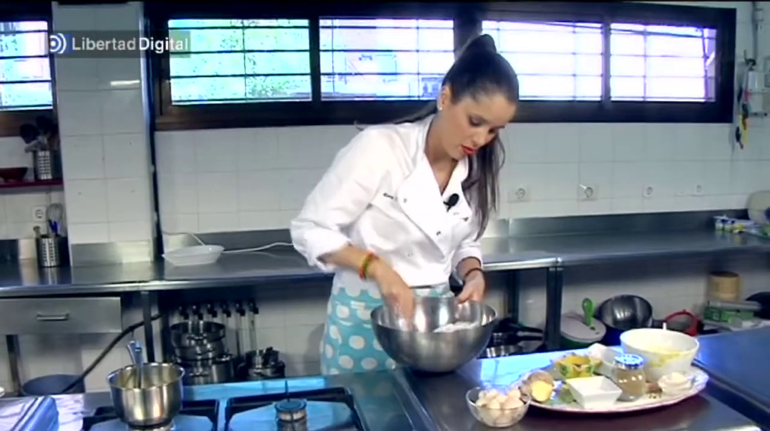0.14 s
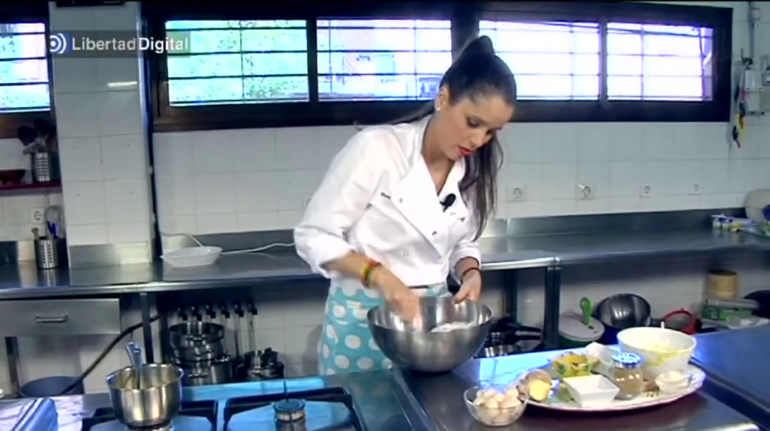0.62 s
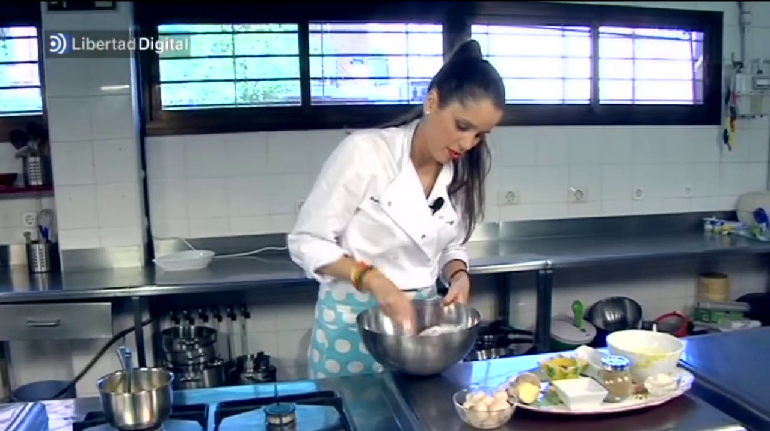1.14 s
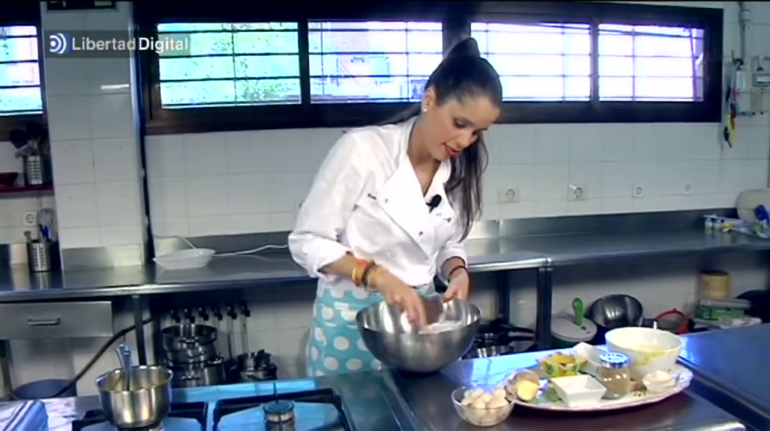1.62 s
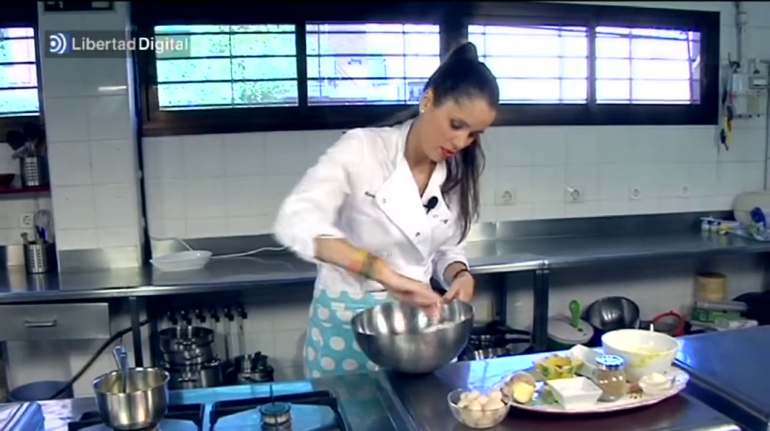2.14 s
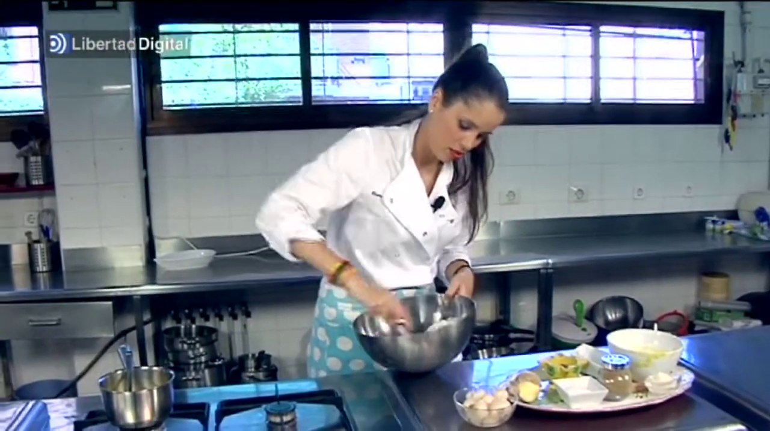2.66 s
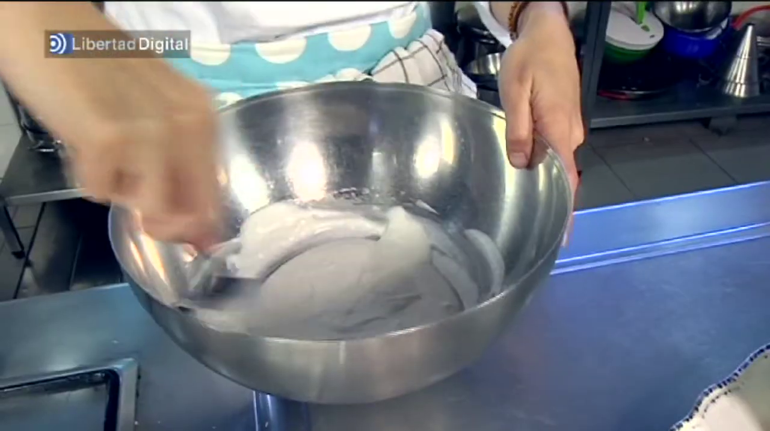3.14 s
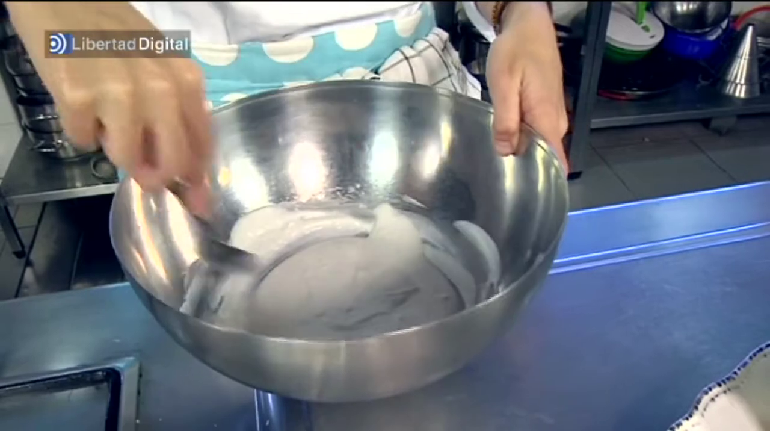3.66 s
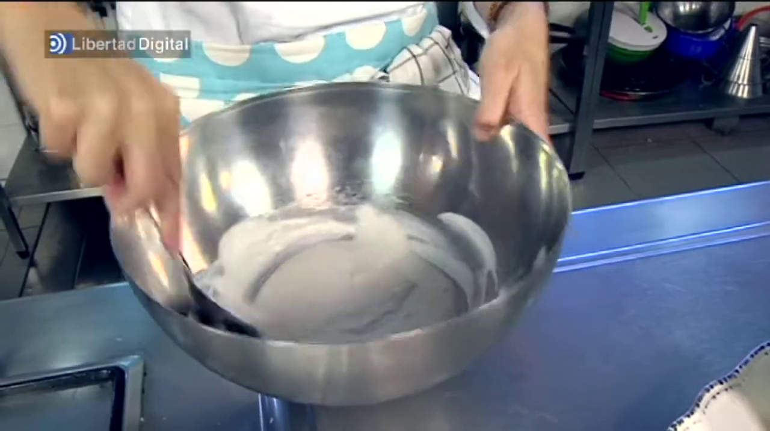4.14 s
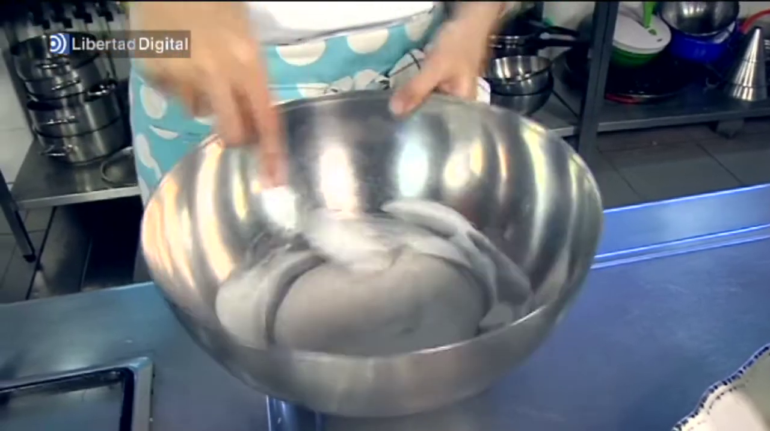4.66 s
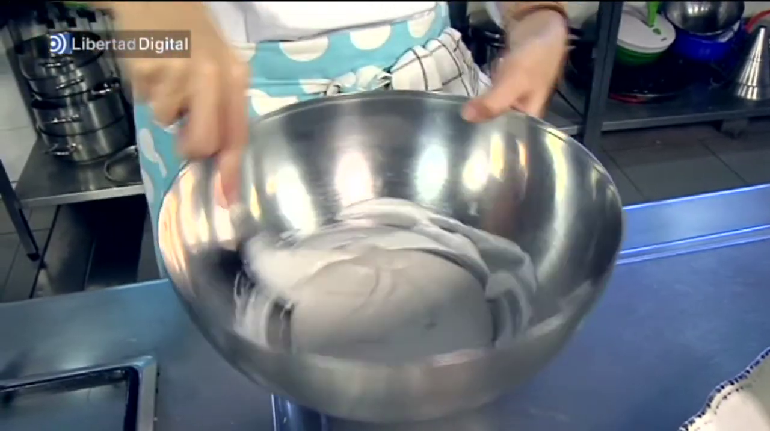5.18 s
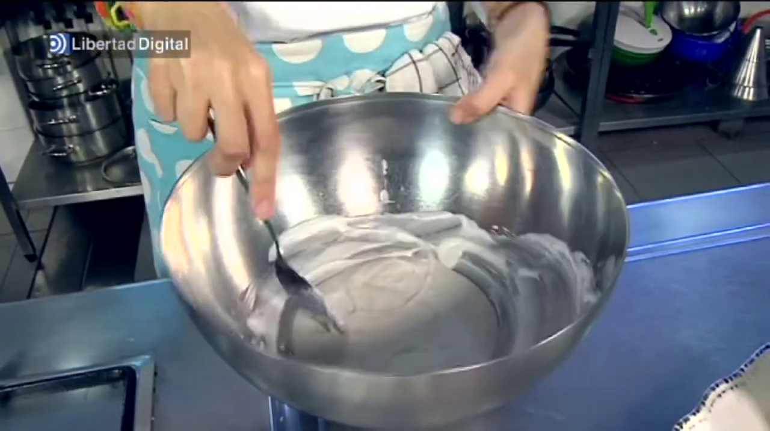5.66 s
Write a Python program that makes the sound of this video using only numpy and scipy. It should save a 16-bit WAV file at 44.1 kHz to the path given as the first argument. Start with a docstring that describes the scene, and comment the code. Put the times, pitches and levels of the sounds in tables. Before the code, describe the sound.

Close, wet metallic stirring in a metal bowl: quick rhythmic circles, then broken scrapes, sharp clinks and the bowl turned on a counter.

```python
"""A spoon stirs thick cream in a steel bowl held against the body, close to a lapel microphone.
Rubbing noise drives the resonances of the bowl: fast circles first, then slow scrapes round the wall,
many begun by a clink, a noisy blow with rebounds. Later the bowl is turned on the steel counter.
A tiled kitchen answers with sparse echoes; cloth and arm push the microphone with low tones; behind
them lies a low ventilation murmur of coloured noise."""
import sys
import numpy as np
from scipy import signal
from scipy.fft import rfft, irfft, next_fast_len
from scipy.io import wavfile
from scipy.ndimage import uniform_filter1d

SR = 44100
rng = np.random.default_rng(int(sys.argv[2]) if len(sys.argv) > 2 else 0)


def generate_wav(signal):
    """Clip the signal to [-1, 1] and save it as 16-bit WAV at the path in sys.argv[1]."""
    frames = np.transpose(np.atleast_2d(signal))
    scaled = np.clip(frames, -1, 1) * 32767
    pcm = np.round(scaled).astype(np.int16)
    wavfile.write(sys.argv[1], SR, pcm)


def voltage_ratio(level):
    """Linear amplitude factor for a level in decibels (scalar or array-like)."""
    return 10 ** (np.asarray(level, float) / 20)


N = 255767


def evened(x):
    """Scales to an rms of 1."""
    return x / np.sqrt(np.mean(x ** 2) + 1e-20)


def read(points, hz):
    """Reads a table on a log-frequency axis."""
    f, value = np.transpose(points)
    return np.interp(np.log(hz + 1), np.log(f + 1), value)


def coloured(x, points):
    """Filters by a spectrum in dB."""
    size = next_fast_len(len(x))
    gain = voltage_ratio(read(points, np.fft.rfftfreq(size, 1 / SR)))
    return irfft(rfft(x, size) * gain, size)[:len(x)]


def resonate(x, hz, width):
    """A causal two-stage resonance of gain 1 that may glide: shift down, smooth twice, shift back."""
    turn = np.exp(2j * np.pi * np.cumsum(hz * np.ones(len(x))) / SR)
    r = np.exp(-np.pi * width / SR)
    smooth = signal.lfilter([(1 - r) ** 2], [1, -2 * r, r * r], x / turn)
    return 2 * (turn * smooth).real


def rung(x, modes, damping=0.93):
    """Sum of a group of resonances, neighbours in opposite phase; damping scales their widths."""
    return sum((-1) ** k * voltage_ratio(db) * resonate(x, hz, width * damping)
               for k, (hz, width, db) in enumerate(modes))


def wander(span):
    """Slow chance, changing over about span samples."""
    return evened(uniform_filter1d(uniform_filter1d(rng.standard_normal(N), span), span))


def follow(rows):
    """Columns of a table of curves at every sample."""
    s, *columns = np.vstack(rows).T
    return [np.interp(np.arange(N) / SR, s, c) for c in columns]


def held(rows, column):
    """A column that keeps its value until the next row."""
    table = np.array(rows)
    row = np.searchsorted(table[:, 0], np.arange(N) / SR) - 1
    return table[np.maximum(row, 0), column]


def strokes(rows, column, fall_db_per_s):
    """Each row bites within 5 ms, holds from start to end and falls away."""
    t, out = np.arange(SR) / SR, np.zeros(N + SR)
    for row in rows:
        start, end = row[:2]
        fall = voltage_ratio(row[column] - fall_db_per_s * np.maximum(t - (end - start), 0))
        out[round(start * SR):][:SR] += np.minimum(t / 0.005, 1) * fall
    return out[:N]


# Slow scrapes round the wall, close to the microphone:
# (start [s], end [s], hiss level [dB], wall ring level [dB], belly ring level [dB])
SCRAPES = [(2.265, 2.355, -59.5, -60.5, -73), (2.365, 2.635, -56.5, -59.5, -57.5),
           (2.889, 3.0, -58, -55, -84), (3.003, 3.16, -60, -61, -89), (3.382, 3.66, -56.5, -52.5, -83),
           (3.938, 4.03, -61.5, -59, -69), (4.04, 4.11, -59, -56.5, -65.5), (4.16, 4.27, -71.5, -70, -64.5),
           (4.285, 4.42, -68, -68.5, -70), (4.45, 4.59, -64, -63, -65), (4.78, 4.85, -79, -75, -87),
           (4.987, 5.0, -71, -60, -68), (5.078, 5.11, -52.5, -51, -71), (5.13, 5.21, -55.5, -53, -61),
           (5.25, 5.31, -67.5, -77, -68.5), (5.33, 5.495, -63, -63.5, -60)]


def scraping():
    """The spoon edge hisses and drives the wall, belly and body of the bowl by friction."""
    hiss_fall, wall_fall, belly_fall = 331, 274, 206  # dB per s after each scrape
    hiss_db, belly_db, circle_hz = circling()
    fast = np.arange(N) / SR < CIRCLES[-1][0]
    edge = friction(slips_per_s=180, spread_db=4.0, share=0.26, judder_db=2.03)
    drag = friction(slips_per_s=190, spread_db=2.5, share=0.23, judder_db=2.5)
    after_clink = chatter()

    uneven = voltage_ratio(1.6 * wander(900))
    hiss_level = voltage_ratio(hiss_db) + uneven * strokes(SCRAPES, column=2, fall_db_per_s=hiss_fall)
    # in the circles the wall ring follows the hiss only in part
    wall_level = fast * voltage_ratio(-58 + 0.73 * (hiss_db + 52)) + voltage_ratio(-22.5) * after_clink
    wall_level += strokes(SCRAPES, column=3, fall_db_per_s=wall_fall)
    belly_level = voltage_ratio(belly_db - 5) + voltage_ratio(-27.5) * after_clink
    belly_level += strokes(SCRAPES, column=4, fall_db_per_s=belly_fall)

    return (hiss_level * edge_hiss(edge, fast) + wall_level * wall_ring(edge, fast)
            + belly_level * belly_ring(drag) + touched_patch(drag, belly_db, circle_hz, fast, belly_fall)
            + body_drone(drag, hiss_db, fast))


def friction(slips_per_s, spread_db, share, judder_db):
    """Smooth rubbing noise roughened by tiny slips and a judder of the hand."""
    slips = voltage_ratio(spread_db * np.minimum(rng.exponential(1, N), 4)) * (rng.random(N) < slips_per_s / SR)
    puffs = signal.oaconvolve(slips, np.exp(-np.arange(400) / (0.00058 * SR)))[:N]
    return (1 + share * evened(puffs)) * voltage_ratio(judder_db * wander(500)) * rng.standard_normal(N)


# Fast circles in the bowl, the last row closing the series; far and near are sides of the bowl:
# (start [s], belly far [dB], belly near [dB], hiss far [dB], hiss near [dB],
#  edge lift between the sides [dB re their mean]); BITE and CIRCLE shape these levels
CIRCLES = [(-.23, -50, -47, -52, -42, -12), (0.031, -46.5, -44.5, -47, -47.5, -25),
           (0.288, -43, -45, -47.5, -48, -20), (0.547, -41, -44.5, -47, -50.5, -18),
           (0.813, -41, -43.5, -47, -46, -22), (1.064, -41.5, -46.5, -45, -48.5, -18),
           (1.323, -42, -45, -49, -48.5, -7), (1.592, -44, -47, -50.5, -48, -11.5),
           (1.847, -44, -60, -51.5, -69.5, -4), (2.05, -89, -71, -92, -90, -8)]
# The path round one circle, down from the rim:
# (part of the turn [0-1], belly ring offset [dB], pitch of the touched patch [Hz])
CIRCLE = [(0, -3.5, 4290), (.08, -4, 2420), (.27, -2.5, 2136), (0.441, -5.5, 2440), (.5, -3.5, 1535),
          (.68, -1, 1620), (0.997, -6, 1680)]
# The edge bites twice a circle: (part of the turn [0-1], hiss offset [dB])
BITE = [(0, -5.5), (.09, -3.5), (.22, -5.5), (.34, 6.5), (.48, -6), (.66, -4.5), (.8, -8), (.91, -13.5)]


def circling():
    """Hiss, belly level and pitch of the touched patch, every circle along the same path."""
    edge, path = [], []
    for row, (end, *_) in zip(CIRCLES, CIRCLES[1:]):
        s, far_db, near_db, far_hiss_db, near_hiss_db, lift_db = row
        for part, db, hz in CIRCLE:
            side_db = far_db if part < .47 else near_db
            path.append((s + part * (end - s), db + side_db, hz))
        # three points on the far side, one where the edge lifts, the rest on the near side
        lifted_db = (far_hiss_db + near_hiss_db) / 2 + lift_db
        sides = [far_hiss_db] * 3 + [lifted_db] + [near_hiss_db] * len(BITE)
        edge += [(s + part * (end - s), db + side_db) for (part, db), side_db in zip(BITE, sides)]
    end = CIRCLES[-1][0]
    edge.append((end + 0.091, -120))
    path += [(end + 0.02, -71, 1690), (end + 0.51, -90, 1650)]
    return follow(edge) + follow(path)


# Colour of the edge on steel: (frequency [Hz], spectral level [dB])
HISS = [(2120, 1.5), (3600, 2), (4290, 3.5), (6310, -7.5), (8100, 1.5), (13900, 3.5), (15700, 4.5),
        (16400, -52)]


def edge_hiss(edge, fast):
    """Edge noise in shifting colours, with grit that is fainter in the fast circles."""
    return patchy(coloured(edge, HISS)) + voltage_ratio(-5 - 6.5 * fast) * grit()


def patchy(x):
    """The colour of the hiss shifts in patches as the edge moves."""
    z = signal.stft(x, nperseg=256)[2]
    chance = rng.standard_normal(z.shape[::-1]).T
    patches = evened(uniform_filter1d(uniform_filter1d(chance, size=10, axis=0), size=12, axis=1))
    return evened(signal.istft(z * voltage_ratio(2.5 * patches), nperseg=256)[1][:N])


def grit():
    """Grains caught under the edge: tiny high ticks on ten pitches, 76 a second in all."""
    t, out = np.arange(200) / SR, np.zeros(N)
    for hz in np.geomspace(5500, 14800, num=10):
        size = voltage_ratio(2.1 * np.minimum(rng.exponential(1, N), 2.5)) * (rng.random(N) < 76 / 10 / SR)
        tick = t * np.exp(-t / .0005) * np.sin(2 * np.pi * hz * t)
        out += signal.oaconvolve(size, tick)[:N]
    return evened(out)


# Wall resonances: (frequency [Hz], width before damping [Hz], level [dB])
WALL = [(5250, 370, -7.5), (5763, 390, 1), (6227, 240, 2), (6655, 410, -0.5), (7490, 560, -11)]


def wall_ring(edge, fast):
    """The moving spoon drives now one wall resonance, now another; fast circles swish the cream."""
    wall = sum(voltage_ratio(db + 3.76 * wander(1800)) * resonate(edge, hz, width * 2.38)
               for hz, width, db in WALL)
    swish = evened(resonate(edge, 4640, 2700))
    return evened(wall) + fast * voltage_ratio(-8) * swish


# Short squeaks of steel under the spoon, each round its own pitch:
# (start [s], end [s], level [dB], pitch [Hz])
SQUEAKS = [(2.91, 2.95, -62, 2870), (2.96, 2.98, -53, 2910), (3.05, 3.2, -75.5, 2720),
           (3.44, 3.57, -64, 2850), (3.62, 3.7, -63, 2684), (4.11, 4.15, -65, 1470),
           (4.45, 4.53, -68, 3630), (4.55, 4.59, -67.5, 2550), (4.82, 4.9, -67, 2000),
           (5.125, 5.15, -60, 3280), (5.155, 5.21, -68, 2600), (5.255, 5.3, -71, 3620),
           (5.335, 5.43, -62.5, 3520), (5.44, 5.465, -67, 3400)]


def touched_patch(drag, belly_db, circle_hz, fast, fall_db_per_s):
    """The touched patch sings: gliding in the circles, round a held pitch in each squeak."""
    t = np.arange(N) / SR
    rim_db = -5.5 * np.log2(np.maximum(circle_hz / 2300, 1))  # weaker toward the rim's high pitch
    level = voltage_ratio(belly_db - 4 + rim_db) + strokes(SQUEAKS, column=2, fall_db_per_s=fall_db_per_s)
    touch_hz = np.where(t < SQUEAKS[0][0], circle_hz, held(SQUEAKS, column=3))
    touch_hz = touch_hz * (1 + np.where(fast, .04, .012) * wander(400))
    creamy = evened(resonate(drag, touch_hz, 240))
    bare = evened(resonate(drag, touch_hz, 150))
    # cream damps the patch less while the spoon runs over bare steel
    return level * np.where((t < 2.3) | (t > 4.0), creamy, bare)


# Belly resonances, damped by cream: (frequency [Hz], width before damping [Hz], level [dB])
BELLY = [(1525, 590, 6.5), (2363, 595, 5), (2686, 330, 1), (3190, 670, 1)]


def belly_ring(drag):
    """The dragging spoon drives the broad resonances of the cream-filled belly."""
    return evened(rung(drag, BELLY))


# The whole bowl droning under the stirring: (time [s], level before pulsing [dB])
DRONE = [(0, -57), (1.92, -53), (2.15, -72), (2.26, -59), (2.27, -52), (2.88, -69.5), (2.9, -53),
         (3.375, -66.5), (3.39, -47.5), (3.55, -64), (3.93, -69), (3.95, -57.5), (4.72, -70.5), (4.8, -59),
         (5.8, -65.5)]
# Body resonances, damped by cream: (frequency [Hz], width before damping [Hz], level [dB])
BODY = [(294, 84, -7), (493, 99, 5), (672, 38.6, 3.5), (733, 120, -8.5), (1076, 226, 1)]


def body_drone(drag, hiss_db, fast):
    """The low body resonances drone under the drag, pulsing a little with the fast circles."""
    body_db, = follow(DRONE)
    pulse_db = fast * 0.18 * np.maximum(hiss_db + 53.5, -15)
    return voltage_ratio(body_db + pulse_db) * evened(rung(drag, BODY, 2.0))


# Spoon against steel, close to the microphone: (time [s], wall ring peak [dB],
# body [dB re wall peak], belly [dB re wall peak], bright tick [dB re wall peak])
CLINKS = [(2.263, -26.5, -1, -3, 10), (2.8873, -23.5, -4, -4.5, 10.5), (2.9645, -35, -24, -15, 8.5),
          (2.9728, -28, -27, -7.5, -14), (3.0032, -28, -39, -9.5, 2), (3.0895, -38, -30, -20, 3),
          (3.1046, -38, -18, -16, -8), (3.1515, -37.5, -27, -20, -11), (3.3803, -18.5, -6.5, -4.5, 5.5),
          (3.5306, -32.5, -35, -36, 5.5), (3.6513, -38.5, -13, -14, -10), (3.9361, -24, -7, -5.5, 8.5),
          (4.1172, -37, -14, -14, -11), (4.9875, -45.5, 2, 3, 12)]


def clinks():
    """A blow with fast rebounds; each part of the bowl rings and is soon choked by the cream."""
    t, out = np.arange(SR // 4) / SR, np.zeros(N + SR)
    rebounds = [(.0008, -9), (.0015, -5), (.0031, -1)]  # (delay [s], level [dB])
    bounces = sum(voltage_ratio(db - 60 * (t - s) / 0.0008) * (t >= s) for s, db in rebounds)
    rattle = voltage_ratio(-22.5 - 60 * t / 0.1) * (t > .001)
    noises = rng.standard_normal((len(CLINKS), len(t)))
    for (s, peak_db, body_db, belly_db, tick_db), noise in zip(CLINKS, noises):
        blow = noise * (bounces + rattle)
        blow[round(.0009 * SR)] += 2.5  # metal on metal: one hard spike
        wall = rung(blow, WALL, 2.2)
        tick = resonate(blow, 12300, 9700)
        # the less a clink moves the body, the clearer the 2780 Hz patch rings
        belly = voltage_ratio(-3.5 - body_db) * resonate(blow, 2780, 135) + rung(blow, BELLY, 0.95)
        body = rung(blow, BODY[1:], 3.17) + .5 * resonate(blow, 560, 2300)
        parts = (wall, 0), (body, body_db), (belly, belly_db), (tick, tick_db)
        out[round(s * SR):][:len(t)] += sum(voltage_ratio(peak_db + db) * p / abs(p).max() for p, db in parts)
    return out[:N]


def chatter():
    """After a clink the spoon chatters on the steel, more the harder the clink moved the body."""
    rows = [(s, s, peak_db + body_db) for s, peak_db, body_db, *_ in CLINKS]
    return strokes(rows, column=2, fall_db_per_s=220)


# The bowl turned on the counter: (time [s], level [dB], length of the grind [s])
TURNS = [(4.225, -52.5, 0.11), (4.761, -48.5, 0.21)]
# Counter resonances: (frequency [Hz], width before damping [Hz], level [dB])
COUNTER = [(171, 74, -5.5), (259, 78, 3), (322, 64, -1), (480, 350, -4), (755, 420, -13.5),
           (1610, 1500, -14.5)]


def turning():
    """The foot of the bowl knocks the counter and grinds round on it, ringing the steel."""
    t, out = np.arange(SR // 2) / SR, np.zeros(N + SR)
    for (s, level_db, length), noise in zip(TURNS, rng.standard_normal((len(TURNS), len(t)))):
        knock = 1 + voltage_ratio(-60 * t / 0.1)
        grind = noise * np.minimum(t / 0.00083, 1) * knock * voltage_ratio(-6 * (t / length) ** 2)
        ring = rung(grind, COUNTER) / np.std(rung(noise, COUNTER))
        out[round(s * SR):][:len(t)] += voltage_ratio(level_db) * ring
    return out[:N]


# Reverberation of the tiled kitchen: (frequency [Hz], time to fall 60 dB [s])
KITCHEN = [(250, 0.14), (1000, 0.75), (3500, 0.33), (6200, 0.62), (9000, 0.27), (15000, 0.085)]


def kitchen(x):
    """Sparse echoes of random sign, each band dying at its own speed."""
    taps = np.zeros(SR)
    at = np.arange(300, SR - 20, 20)
    taps[at + rng.integers(0, 20, at.shape)] = rng.choice([-1., 1.], at.shape)
    hz, t, z = signal.stft(taps, SR, nperseg=256)
    fading = z * voltage_ratio(-60 * t / read(KITCHEN, hz)[:, None])
    tail = signal.istft(fading, SR, nperseg=256)[1]
    return signal.fftconvolve(x, tail / np.linalg.norm(tail))[:N]


# Cloth and arm movement pushing the microphone:
# (time [s], level of the lowest partial [dB], its frequency [Hz], half length [s])
RUMBLE = [(0.114, -48, 71.3, 0.019), (1.45, -53, 45, 0.016), (2.212, -51, 69.6, 0.02),
          (2.427, -52.5, 66.3, 0.03), (2.986, -47.5, 65, 0.013), (4.403, -37, 30.3, 0.031),
          (4.463, -44, 44.6, 0.014), (4.527, -46, 29.8, 0.016), (4.931, -41, 38, 0.022),
          (5.336, -43, 55, 0.012)]
# Colour of the steady rumble at the microphone: (frequency [Hz], spectral level [dB])
RUMBLE_COLOUR = [(12, -9), (28, -3.5), (60, -6), (110, -5), (160, -36), (300, -41)]


def rumble():
    """Soft low pushes of three partials over a lumpy, steady rumble."""
    t, pushes = np.arange(N) / SR, np.zeros(N)
    for (s, db, hz, length), turn in zip(RUMBLE, rng.random(len(RUMBLE))):
        swell = np.exp(-.5 * ((t - s) / length) ** 2)
        tone = sum(np.sin(2 * np.pi * k * (hz * t + turn)) / k ** 1.19 for k in (1, 2.3, 3.4))
        pushes += voltage_ratio(db) * swell * tone
    lumpy_db = -64 + 1.1 * wander(3000)
    return pushes + voltage_ratio(lumpy_db) * evened(coloured(rng.standard_normal(N), RUMBLE_COLOUR))


# Colour of the ventilation murmur in the room: (frequency [Hz], spectral level [dB])
AIR = [(59, -27), (100, -11), (185, -9), (308, -16), (991, -17.5), (1150, -23.5), (1250, -21), (1830, -27),
       (4000, -40.5), (16000, -50)]


def room_air():
    """Low ventilation murmur: steady coloured noise at -59 dB rms."""
    return voltage_ratio(-59) * evened(coloured(rng.standard_normal(N), AIR))


def scene():
    """Bowl, its echoes, microphone rumble and room air."""
    rubbed, struck = scraping() + turning(), clinks()
    echoes = kitchen(voltage_ratio(-12) * rubbed + voltage_ratio(-15.5) * struck)
    return (rubbed + struck + echoes + rumble() + room_air())[None]


def top_cut(x):
    """Nothing passes above the cut-off."""
    return signal.sosfilt(signal.butter(12, 17100, fs=SR, output="sos"), x)


# Centres of the narrow notches in the microphone signal: (frequency [Hz])
NOTCH_HZ = np.r_[150, 300:5400:300, 5400:16000:600]


def record(dry):
    """A comb of narrow causal notches, then a band limit near 16 kHz."""
    size = next_fast_len(N)
    hz = np.fft.rfftfreq(size, 1 / SR)
    gain = voltage_ratio(-25 * np.clip((hz - 15900) / 150, 0, 1)) + 0j
    for notch_hz in NOTCH_HZ:
        offset = 1j * (hz - notch_hz)
        gain *= (1.1 + offset) / (15.0 + offset)
    mix = irfft(rfft(dry, size) * gain, size)[:, :N]
    return top_cut(mix)


dry = scene()
out = record(dry)
generate_wav(out)
```